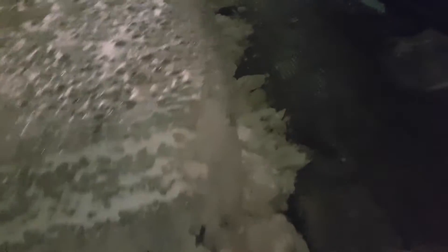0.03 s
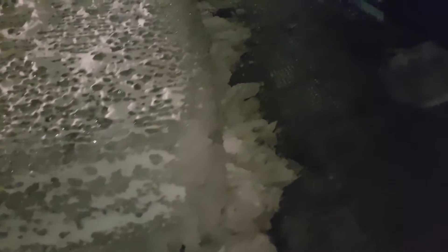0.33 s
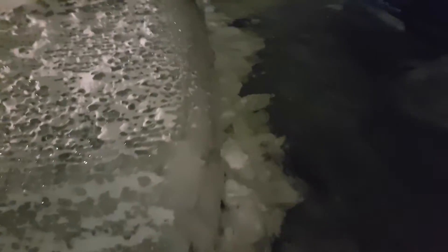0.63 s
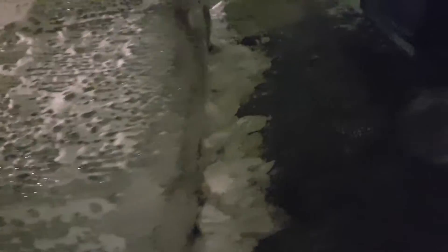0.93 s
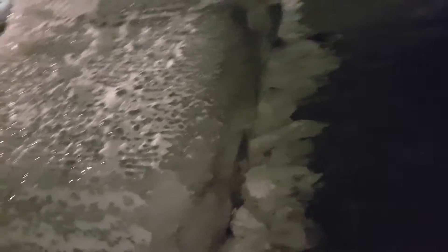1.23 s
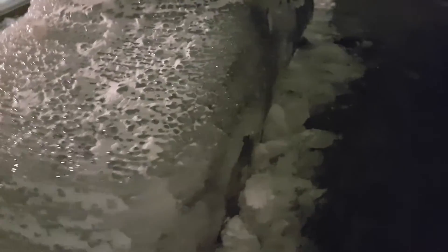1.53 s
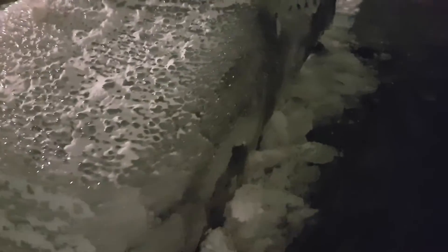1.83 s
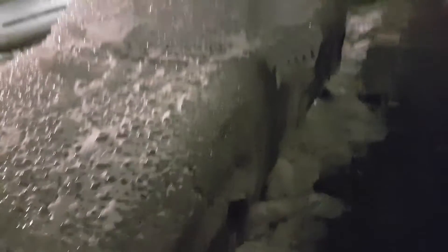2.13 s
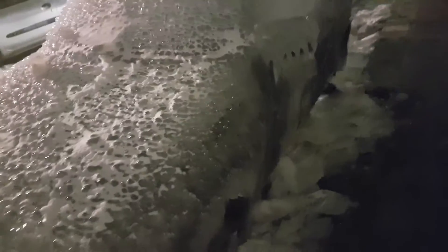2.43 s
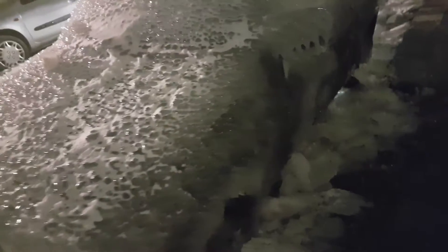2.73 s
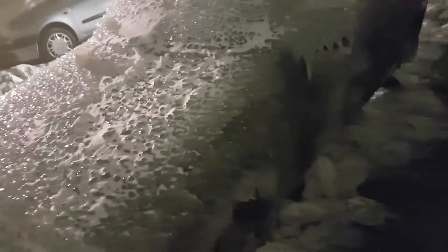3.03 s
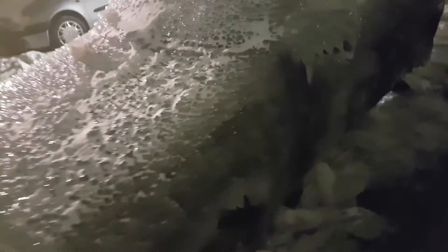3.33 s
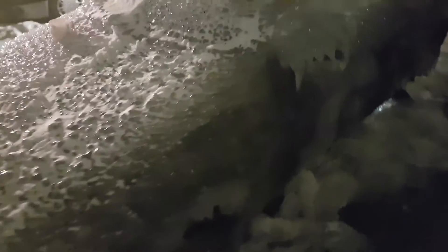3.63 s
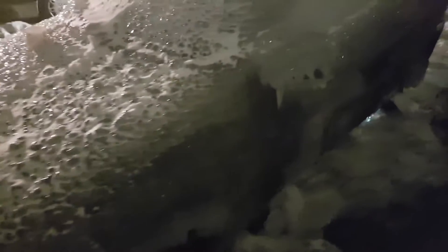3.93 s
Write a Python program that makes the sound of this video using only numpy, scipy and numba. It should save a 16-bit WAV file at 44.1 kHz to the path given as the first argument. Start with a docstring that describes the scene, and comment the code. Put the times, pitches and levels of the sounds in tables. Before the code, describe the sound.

Slow footsteps crunch on crusted, icy snow outdoors, each with small snaps of ice and a fine gritty fizz. Uneven wind rumbles and thumps on the microphone, growing stronger toward the end, over a faint town hush.

```python
"""On crusted, icy snow at night, someone takes slow steps. Under each boot the crust crushes in a
burst of tiny fractures, plates of ice snap, and loose grit tinkles; once the sole grinds on a ridge.
Wind buffets the two microphone openings (the left and right "ports"), each on its own, with small
swirls of air called eddies. Behind it all lies the faint hush of a town."""
import sys
import numpy as np
from scipy import signal
from scipy.fft import rfft, irfft
from scipy.io import wavfile
from scipy.ndimage import uniform_filter1d, minimum_filter1d
from numba import njit

SR = 44100
rng = np.random.default_rng(int(sys.argv[2]) if len(sys.argv) > 2 else 0)


def persist_wave(psi):
    """Save psi, clipped to +-1, as 16-bit WAV."""
    counts = np.round(np.clip(psi, -1, 1) * 32767).astype(np.int16)
    wavfile.write(sys.argv[1], SR, np.atleast_2d(counts).T)


N = 176400
TIME = np.arange(N) / SR
FRACTURES_PER_S, CLUMP_RATE_HZ = 5000, 260
BOOT_PAN_DB, FIZZ_PAN_DB = -1, 0.5   # left minus right
CRUNCH_LIKENESS, FIZZ_LIKENESS = 0.67, 0.1   # share of the power that both ports have in common


def from_db(db):
    """Turn decibels into a number to multiply by."""
    return 10 ** (np.asarray(db) / 20)


def rms_one(x):
    """Scale a signal so that its average power is 1."""
    return x / np.sqrt(np.mean(x ** 2) + 1e-20)


def in_time(rows):
    """Join (time_s, value) rows by straight lines."""
    return np.interp(TIME, *np.transpose(rows))


def for_port(rows, port):
    """Pick a table's first column and the column of one port (0 left, 1 right)."""
    return np.array(rows)[:, [0, port + 1]]


def pan(db):
    """Left and right gains that make the left louder by db."""
    return from_db(np.array([[db], [-db]]) / 2)


def drift(rate_hz):
    """A smooth random wobble with a typical size of 1."""
    r = np.exp(-2 * np.pi * rate_hz / SR)
    return rms_one(signal.lfilter([1], [1, -2 * r, r * r], rng.standard_normal(N + SR))[SR:])


def envelope(start_s, attack_s, hold_s, fade_s):
    """Rise, hold, then die away by 60 dB every fade_s."""
    age = TIME - start_s
    rise = np.clip(age / max(attack_s, 1e-4), 0, 1)
    return rise * np.exp(-np.log(1000) * np.maximum(age - attack_s - hold_s, 0) / fade_s)


def steady(x, window_s):
    """Even out the level over a short window."""
    size = int(window_s * SR) + 1
    power = uniform_filter1d(uniform_filter1d(x * x, size), size)
    return x / np.sqrt(np.abs(power) + 1e-12)


def butter(x, hz, kind, order=2):
    """Keep the lows, the highs or a band of a sound."""
    return signal.sosfilt(signal.butter(order, hz, kind, fs=SR, output="sos"), x)


def colour(x, spectrum, keep_power=True):
    """Shape the tone by (pitch_hz, level_db) rows; by default white noise keeps its power."""
    size = 2048
    hz, db = np.transpose(spectrum)
    bin_hz = np.arange(size // 2 + 1) * SR / size
    gain = from_db(np.interp(np.log(bin_hz + 1), np.log(hz), db))
    # build the filter so that it never sounds before its input
    cepstrum = irfft(np.log(rms_one(gain) if keep_power else gain))[:size // 2]
    cepstrum[0] /= 2
    click_response = irfft(np.exp(rfft(2 * cepstrum, size)))
    return signal.fftconvolve(x, click_response)[:N]


def ring(x, hz, width_hz):
    """Ring at one pitch; a narrower width rings longer."""
    r = np.exp(-np.pi * width_hz / SR)
    feed = np.sqrt((1 - r * r) / 2) * np.array([1, 0, -1])
    return signal.lfilter(feed, [1, -2 * r * np.cos(2 * np.pi * hz / SR), r * r], x + 1e-18)


@njit
def moving_lowpass(x, share, order):
    """Dull a sound by a changing amount: each stage moves a share of the way to its input."""
    out, state = np.empty_like(x), np.zeros(order)
    for i in range(len(x)):
        value = x[i]
        for k in range(order):
            state[k] += share[i] * (value - state[k])
            value = state[k]
        out[i] = value
    return out


def port_tone(sound, port):
    """Each port colours the sound that reaches it through the air."""
    # treble response of the ports: pitch_hz, left_db, right_db
    treble = [(2000, -2, 0.5), (2750, -3.5, -0.5), (3900, -2.5, -1), (5000, -3, 0.5), (7000, -6.5, 1.5),
              (8100, 0.5, 2.5), (9500, 0, -8.5), (13000, 0, 0)]
    return colour(sound, for_port(treble, port), keep_power=False)


def town(likeness=0.071):
    """The smooth hush of a far town, slightly alike in both ports."""
    # tone of the hush: pitch_hz, level_db
    tone = [(30, -7.5), (120, 6.5), (300, -6), (600, -19), (1700, -23), (3500, -32.5), (6000, -40.5),
            (9200, -46.5), (16000, -48)]
    # loudness of the hush, which dips now and then: time_s, level_db
    levels = [(0, -37), (.5, -35), (1.5, -34.5), (2.05, -36), (3.4, -34.5), (3.82, -38), (4, -37.5)]
    shared, left, right = (colour(white, tone) for white in rng.standard_normal((3, N)))
    hush = np.sqrt(likeness) * shared + np.sqrt(1 - likeness) * np.array([left, right])
    return from_db(in_time(levels)) * pan(db=-1) * hush


def wind(port, base_hz=419, limit_hz=1210, sway_hz=48.7):
    """Eddies buffet one port over a slow sway of pressure; stronger wind is louder and sharper."""
    # wind strength at the left port: time_s, level_db
    left_wind = [(0.0, -23), (0.26, -47), (0.3, -22), (0.43, -46), (0.47, -31), (0.53, -43), (0.66, -45),
                 (0.72, -18), (0.85, -20.5), (1.29, -16), (1.56, -37), (1.65, -25), (1.88, -29.5),
                 (2.0, -11), (2.12, -37), (2.19, -54), (2.25, -17), (2.32, -35), (2.36, -5), (2.46, -33.5),
                 (2.7, -18.5), (2.87, -13.5), (2.9, -29.5), (3.12, -28), (3.2, -10), (3.25, -22.5),
                 (3.29, -11.5), (3.35, -21.5), (3.52, -7.5), (3.58, -14.0), (3.71, -6), (3.74, -19.5),
                 (3.84, 0), (3.89, -27.5), (3.92, -11.5), (4.0, -5.5)]
    # wind strength at the right port: time_s, level_db
    right_wind = [(0.0, -17), (0.22, -31.5), (0.288, -14), (0.42, -34), (0.46, -15), (0.532, -39.5),
                  (0.572, -23), (0.599, -34.5), (0.629, -17), (0.65, -45.5), (0.84, -27.5), (0.961, -8.5),
                  (1.051, -23.5), (1.079, -8.5), (1.129, -24.5), (1.252, -14), (1.29, -36.5), (1.33, -24.5),
                  (1.441, -17), (1.48, -25.5), (1.528, -14.5), (1.64, -12.5), (1.7, -22), (1.73, -9.5),
                  (1.83, -29.5), (1.91, -40), (2.02, -17.5), (2.118, -12), (2.159, -41.5), (2.25, -29),
                  (2.31, -10.5), (2.371, -35), (2.41, -10), (2.438, -30), (2.49, -14), (2.54, -27),
                  (2.56, -15), (2.64, -25), (2.671, -8), (2.82, -23.5), (2.938, -7), (3.062, -15.5),
                  (3.092, 3), (3.138, -15), (3.26, -20), (3.3, -15.5), (3.48, -13), (3.659, -44),
                  (3.72, -8.5), (3.84, -22.5), (3.888, -6), (4.0, -36)]
    # extra sharpness of the eddies (6 dB about doubles corner_hz): time_s, left_db, right_db
    sharpness = [(.6, 1, 1.5), (1.25, 2.5, 0), (1.7, -1, -1.5), (2.36, -2.5, -2), (2.7, -1.5, -3),
                 (3.45, -0.5, -0.5), (3.7, 4, -1)]
    # how a port responds to eddies: pitch_hz, level_db
    response = [(35, -16.5), (60, -6.5), (120, -0.5), (200, -0.5), (330, -1), (600, 0), (1300, 1.5),
                (3000, 8)]
    usual_db = -15
    gust_db = in_time((left_wind, right_wind)[port]) - usual_db
    flicker_db = 2.5 * drift(rate_hz=82)
    corner_hz = base_hz * from_db(0.35 * gust_db + in_time(for_port(sharpness, port)) + flicker_db)
    corner_hz = corner_hz / np.hypot(1, corner_hz / limit_hz)   # levels off below the limit
    eddies = moving_lowpass(rng.standard_normal(N), 1 - np.exp(-2 * np.pi * corner_hz / SR), order=6)
    eddies = steady(colour(eddies, response), window_s=0.15)
    sway = rms_one(butter(rng.standard_normal(N), [sway_hz / 2, sway_hz * 2], "band"))
    return from_db(usual_db) * (from_db(0.68 * gust_db) * eddies + from_db(1.6 * gust_db - 20) * sway)


def thumps():
    """A single eddy is one short swing of pressure, mostly at one port; small ones sound higher."""
    # eddies that hit a port: time_s, level_db, left_minus_right_db, pitch_hz
    hits = [(0.9649, -1.5, -46, 370), (1.091, -9, -16, 93), (1.254, -12.5, -9, 200),
            (1.447, -12.5, -18, 390), (1.592, -17, -35, 604), (1.99, -17, 8, 300), (2.318, -8.5, -11, 145),
            (3.116, -12.5, -25, 550), (3.612, -11, 25, 306), (3.789, -11, 10, 450)]
    out = 0
    for time_s, level_db, pan_db, pitch_hz in hits:
        scaled_time = (TIME - time_s) * pitch_hz * np.pi / 2
        swing = np.real(np.exp(2j * np.pi * rng.random()) / (1 + 1j * scaled_time) ** 5)
        ports = 2 * pan(pan_db) / pan(pan_db).sum()
        out = out + ports * from_db(level_db) * swing
    return out


def fractures(per_s, spread_db=2):
    """Tiny breaks in the ice: random clicks of uneven size."""
    sizes = from_db(spread_db * np.minimum(rng.exponential(1, N), 5))
    signs = rng.choice([-1, 1], N)
    return rms_one(sizes * signs * (rng.random(N) < per_s / SR))


def from_the_ground(make_sound, pan_db, likeness, left_delay_s=0.00006):
    """Direct sound from below and to the right, plus scatter off the ice that differs in each port."""
    direct = make_sound()
    direct = np.array([np.interp(TIME - left_delay_s, TIME, direct), direct])
    scatter = np.array([make_sound(), make_sound()])
    return pan(pan_db) * (np.sqrt(likeness) * direct + np.sqrt(1 - likeness) * scatter)


def grind():
    """The sole rasps over a ridge of ice and sets it ringing."""
    load = from_db(-45) * envelope(start_s=3.306, attack_s=0.0021, hold_s=0.046, fade_s=0.22)
    return from_the_ground(lambda: ring(load * fractures(FRACTURES_PER_S), hz=3200, width_hz=540),
                           BOOT_PAN_DB, FIZZ_LIKENESS)


def tinkle(load, count=24):
    """Single loose crystals ring briefly, each at a pitch of its own."""
    clicks = load * fractures(per_s=600)
    owner = rng.integers(0, count, N)   # which crystal each click strikes
    pitches_hz = np.geomspace(3470, 14430, count)
    rings = (ring(clicks * (owner == k), hz, width_hz=2 * hz / 73) for k, hz in enumerate(pitches_hz))
    return from_db(-5.5) * sum(rings)


def crystals(load, split_hz=4800, grit_db=-13, grit_fade_s=0.32):
    """Coarse and fine ice crystals fizz as they break in separate clumps; grit tinkles on after."""
    # tone of breaking crystals: pitch_hz, level_db
    tone = [(1500, -12), (3300, 7.5), (5200, -3.5), (7500, -3.5), (9200, -2.5), (15500, -3.5)]
    fizz = from_the_ground(lambda: colour(load * fractures(2 * FRACTURES_PER_S), tone),
                           FIZZ_PAN_DB, FIZZ_LIKENESS)
    coarse, fine = (butter(fizz, split_hz, kind, order=3) * rms_one(from_db(drift(CLUMP_RATE_HZ / 2)))
                    for kind in ("low", "high"))
    decay = np.exp(-2 * np.log(1000) / (grit_fade_s * SR))
    lingering_power = signal.lfilter([1 - decay], [1, -decay], load ** 2 + 1e-18)
    grit_load = np.sqrt(load ** 2 + from_db(grit_db) ** 2 * lingering_power)
    grit = from_the_ground(lambda: tinkle(grit_load), FIZZ_PAN_DB, FIZZ_LIKENESS)
    return (coarse + fine) / np.sqrt(2) + grit


def snaps(half_width_octaves=0.56):
    """A sharp break and a short spray of chips ring a plate of ice, with a spit of fizz."""
    # plates that snap: start_s, crack_db, fizz_db, pitch_hz
    plates = [(0.6786, -24.5, -59, 1500), (0.751, -52, -37.5, 1600), (0.8643, -25.5, -48, 1330),
              (0.9837, -52, -44.5, 2200), (1.5554, -33.5, -48.5, 2410), (1.734, -30, -60, 1600),
              (1.7489, -21.5, -43.5, 1870), (1.8057, -35, -42, 2230), (1.8245, -31, -63, 1920),
              (1.835, -28.5, -38, 1760), (2.2748, -38, -54, 2210), (2.2896, -33, -47, 1900),
              (2.370, -41, -50, 2400), (2.3856, -32.5, -56, 1940), (2.4013, -30, -47, 2120),
              (2.968, -34, -44, 2110), (3.4695, -25, -43, 1900), (3.509, -36, -57.5, 1700),
              (3.5478, -27.5, -50, 1690), (3.5702, -28.5, -47.5, 1370)]
    cracks, fizz_load = 0, 0
    chips = from_the_ground(lambda: steady(fractures(per_s=3700), window_s=0.0099), 0, CRUNCH_LIKENESS)
    for start_s, crack_db, fizz_db, pitch_hz in plates:
        burst = envelope(start_s, attack_s=0, hold_s=0.002, fade_s=0.024)
        force = burst * chips + 1e-18
        force[:, int(start_s * SR)] += from_db(18)   # the first break stands out above the chips
        low_hz, high_hz = pitch_hz * 2 ** -half_width_octaves, pitch_hz * 2 ** half_width_octaves
        band_gain = np.sqrt(SR / 4 / (high_hz - low_hz))   # makes narrow and wide bands equally strong
        cracks = cracks + from_db(crack_db) * band_gain * butter(force, [low_hz, high_hz], "band", 3)
        fizz_load = fizz_load + from_db(fizz_db) * burst
    return pan(BOOT_PAN_DB) * cracks + crystals(fizz_load)


def crushes(clump_db=2):
    """Dense clumps of fractures under the boot: the crust crunches and its crystals fizz."""
    # moments when the crust gives way: start_s, attack_s, hold_s, fade_s, crunch_db, fizz_db
    presses = [(-.004, 0.0021, 0.0076, 0.38, -21.5, -34), (0.052, 0.021, 0.019, 0.21, -27, -37.5),
               (0.156, 0.041, 0.025, 0.19, -56, -53), (0.631, 0.029, .015, 0.21, -42, -59),
               (0.678, 0.001, 0.044, 0.19, -28.5, -44.5), (0.775, 0.0011, 0.0062, 0.21, -31, -40.5),
               (0.8564, 0.0018, 0.018, 0.13, -25.5, -40), (0.955, 0.017, 0.054, 0.83, -42, -53),
               (1.568, 0.012, 0.007, 0.13, -38.5, -41.5), (1.612, 0.0064, 0.01, 0.23, -40.5, -49.5),
               (1.662, 0.017, 0.095, 0.2, -42, -57.5), (1.799, 0.012, 0.042, 0.18, -47, -53),
               (2.498, 0.031, 0.022, 0.078, -47, -46.5), (2.9, 0.015, 0.057, 0.31, -49, -61),
               (3.213, 0.0088, 0.003, 0.083, -57, -47), (3.303, 0.0021, 0.08, 0.1, -41.5, -46),
               (3.459, 0.02, 0.14, 0.28, -51.5, -66)]
    # tone of the crust under the sole: pitch_hz, level_db
    tone = [(250, -3.5), (450, 1.5), (700, -5.5), (1200, -0.5), (2150, -1), (2700, -8), (3600, -21),
            (5700, -22), (7600, -20.5), (9200, -40), (16000, -46)]
    crunch_load, fizz_load = 0, 0
    for start_s, attack_s, hold_s, fade_s, crunch_db, fizz_db in presses:
        load = envelope(start_s, attack_s, hold_s, fade_s)
        crunch_load = crunch_load + load * from_db(crunch_db)
        fizz_load = fizz_load + load * from_db(fizz_db)
    clumps = steady(from_db(clump_db * drift(CLUMP_RATE_HZ)), window_s=0.06)
    crunch = from_the_ground(lambda: colour(crunch_load * clumps * fractures(FRACTURES_PER_S), tone),
                             BOOT_PAN_DB, CRUNCH_LIKENESS)
    return crunch + crystals(fizz_load)


def scene():
    """Boots and town as each port hears them, plus the wind on that port."""
    air = crushes() + snaps() + grind() + town()
    return thumps() + np.array([port_tone(air[port], port) + wind(port) for port in (0, 1)])


def record(dry):
    """A fast limiter turns down the wind peaks in each channel, and the highest treble is cut."""
    ceiling, window, cutoff_hz = 0.95, int(0.006 * SR), 15850
    gain = minimum_filter1d(ceiling / np.maximum(np.abs(dry), ceiling), 2 * window, axis=1)
    gain = uniform_filter1d(uniform_filter1d(gain, window, axis=1), window, axis=1)
    treble_cut = signal.ellip(12, 0.1, 90, cutoff_hz, fs=SR, output="sos")
    return signal.sosfilt(treble_cut, dry * gain)


dry = scene()
out = record(dry)
persist_wave(out)
```